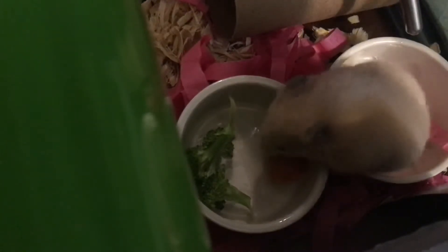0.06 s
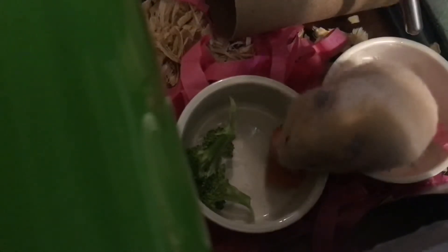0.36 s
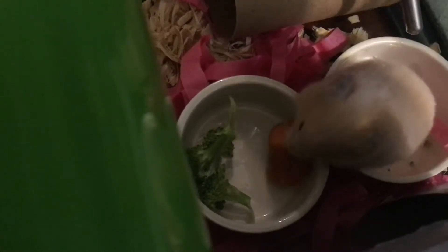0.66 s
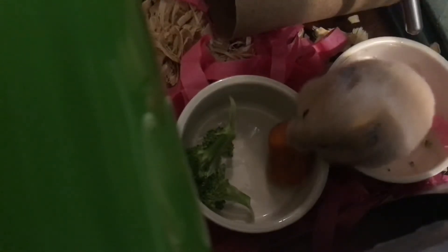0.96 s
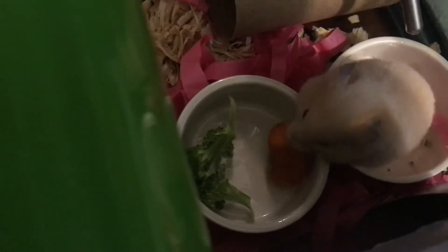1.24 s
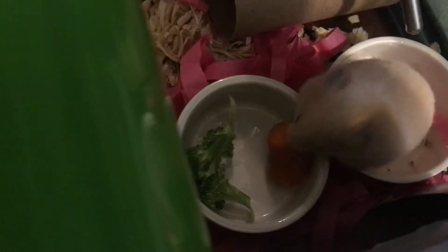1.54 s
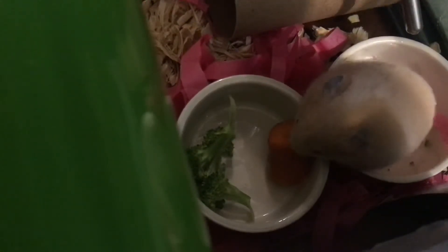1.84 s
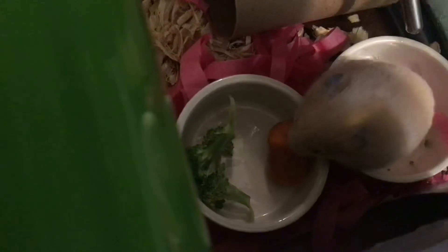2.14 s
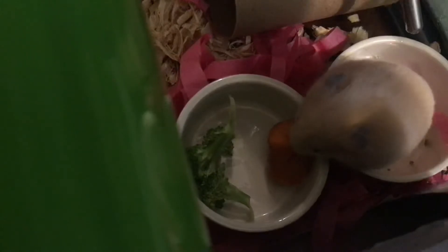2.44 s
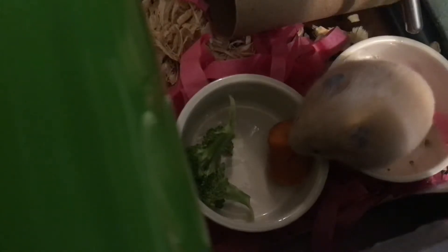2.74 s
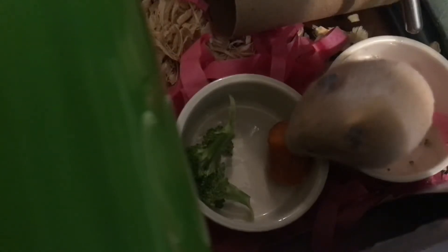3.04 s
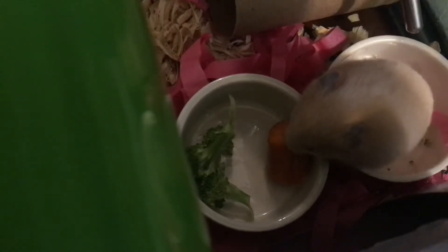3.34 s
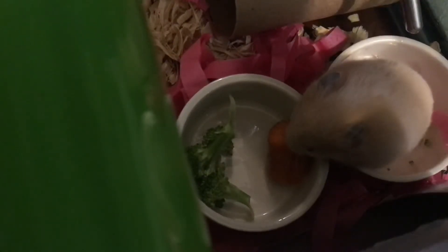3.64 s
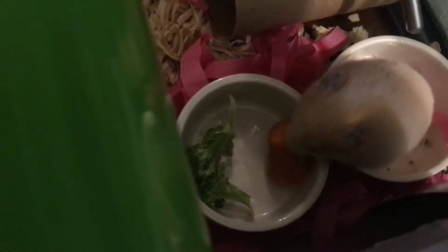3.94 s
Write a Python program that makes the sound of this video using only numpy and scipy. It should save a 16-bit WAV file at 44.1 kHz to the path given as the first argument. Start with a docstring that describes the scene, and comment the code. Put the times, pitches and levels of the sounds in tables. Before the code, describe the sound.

A hamster gnaws carrot close to the microphone in a quiet, humming room. Bedding rustles and claws knock on a ceramic bowl first, then come small irregular crunches with sharp snaps, faint tooth ticks and moist chewing.

```python
"""A cage in a quiet, humming, rumbling room: close up, a hamster gnaws carrot in a ceramic bowl.
Bedding rustles and claws knock and scratch on the bowl, then the bites start. Each bite is a
swelling crackle of bursting cells, with sharp snaps where a piece gives way. Faint tooth ticks
and moist pulp fill the gaps. The bowl rings briefly after each knock and snap."""
import sys
import numpy as np
from scipy import signal
from scipy.fft import rfft, irfft
from scipy.io import wavfile

SR = 44100
rng = np.random.default_rng(int(sys.argv[2]) if len(sys.argv) > 2 else 0)


def output_pcm(signal):
    """Save a mono or channel-first signal as 16-bit PCM at the path in sys.argv[1].

    Samples are clipped to [-1, 1] before scaling.
    """
    pcm = np.clip(np.atleast_2d(signal).T, -1, 1) * 32767
    wavfile.write(sys.argv[1], SR, np.round(pcm).astype(np.int16))


N = 176400
T = np.arange(N) / SR
ONSET_S = .00035

# carrot chewed in the mouth: f/Hz, gain/dB
CHEWED_SPECTRUM = [(300, -14), (800, -13), (1500, -9), (2000, -5), (3000, -2.5), (4200, -5.5), (5200, 3.5),
                   (6000, 2), (7100, 3), (8000, -7), (9400, -5), (10600, -8.5), (12000, -3), (12800, -4),
                   (13600, -9.5), (15000, -6), (16500, -10)]


def amp(db):
    """Decibels to gain."""
    return 10 ** (np.asarray(db) / 20)


def unit(x):
    """Scale to rms 1."""
    return x / np.sqrt(np.mean(x ** 2) + 1e-20)


def spectrum_db(points, hz):
    """Interpolate a spectrum over log frequency."""
    f, db = np.transpose(points)
    return np.interp(np.log(hz + 1), np.log(f), db)


def add(mix, at_s, sound):
    """Mix a sound in at a time."""
    part = mix[max(round(at_s * SR), 0):][:len(sound)]
    part += sound[:len(part)]


def colour(x, points, low_db=0, top_db=0, ring_hz=None, size=1024):
    """Minimum-phase filter: spectrum, two shelves, optional resonance. Keeps the energy."""
    hz = abs(np.fft.fftfreq(size, 1 / SR))
    db = spectrum_db(points, hz) + np.interp(hz, (670, 11400), [low_db, 0])
    db += np.interp(hz, (7700, 11000), [0, top_db])
    if ring_hz:
        db += 5 / (1 + ((hz - ring_hz) / 260) ** 2)
    response = np.exp(np.conj(signal.hilbert(np.log(amp(db)))))
    y = signal.fftconvolve(x, np.fft.ifft(response).real[:size // 2])
    return y * np.sqrt(np.sum(x ** 2) / (np.sum(y ** 2) + 1e-20))


def noise(density):
    """Noise with amplitude density(f) per root Hz."""
    white = rfft(rng.standard_normal(N))
    return irfft(white * density(np.fft.rfftfreq(N, 1 / SR)), N) * np.sqrt(SR / 2)


def burst(decay_s, hz=None, uneven=.6):
    """Brief fracture noise, or a damped ring if pitched. Energy of 1 ms at rms 1."""
    t = np.arange(700) / SR
    envelope = (1 - np.exp(-t / ONSET_S)) * np.exp(-t / decay_s)
    if hz is None:
        spectrum = rfft(envelope * rng.standard_normal(len(t)))
        spectrum /= abs(spectrum) ** (1 - uneven)  # 0 flat, 1 like noise
        y = irfft(spectrum) * np.exp(-t / (10 * decay_s))
    else:
        y = envelope * np.sin(2 * np.pi * hz * t)
    return y / np.linalg.norm(y) * np.sqrt(SR / 1000)


def crackle(per_s, pitches=32, spread_db=4, decay_s=.00028):
    """Random short pitched pops, mostly small, a few large."""
    onsets = np.flatnonzero(rng.random(N) < per_s / SR)
    gain = amp(spread_db * np.minimum(rng.exponential(1, N), 3.5)) * rng.choice([-1, 1], N)
    pitch_index = rng.integers(0, pitches, N)
    t, out = T[:SR // 500], np.zeros(N)
    pop_hz = np.linspace(700, 16000, pitches)[:, None]
    pops = np.sin(2 * np.pi * pop_hz * t) * np.exp(-t / decay_s)
    for n in onsets:
        add(out, n / SR, gain[n] * pops[pitch_index[n]])
    return unit(out)


def room():
    """Air noise with low resonances, wavering mains hum, soft low bumps."""
    air = [(20, -104), (35, -102.5), (75, -78.5), (100, -79.5), (170, -85.5), (215, -89), (265, -94.5),
           (340, -89.5), (450, -99), (560, -96.5), (680, -101.5), (1000, -105), (1400, -106.5),
           (2000, -108), (3000, -111.5), (6500, -114), (10300, -119), (13000, -115.5), (16000, -119)]  # noise floor: f/Hz, density/(dB per Hz)
    resonances = [(52.6, 16, -73.5), (140.1, 13.1, -68.5), (191, 65, -84), (380.4, 22, -84)]  # air resonances: f/Hz, width/Hz, density/(dB per Hz)
    hum = [(60, -60), (120, -53.5), (180, -58), (240, -64.5), (300, -69), (360, -70.5), (420, -85),
           (600, -80.5), (660, -78.5), (700.6, -80), (900, -83)]  # mains lines: f/Hz, rms level/dB
    bumps = [(.36, 0.03, -44.5, 54.47), (.45, 0.019, -52, 235), (1.62, 0.027, -50.5, 47),
             (1.73, 0.22, -58, 44), (2.67, 0.11, -55.5, 46), (3.37, 0.084, -53.5, 56),
             (3.665, 0.0084, -64, 440), (3.97, 0.031, -50.5, 48)]  # low bumps: t/s, width/s, level/dB, f/Hz
    out = noise(lambda f: amp(spectrum_db(air, f)))
    for hz, width_hz, db in resonances:
        out += noise(lambda f: amp(db) / (1 + ((f - hz) / width_hz) ** 2) ** 2)
    for hz, db in hum:
        waver = 1 + .2 * unit(noise(lambda f: np.exp(-f / 13)))
        out += amp(db) * np.sqrt(2) * waver * np.sin(2 * np.pi * (hz * T + rng.random()))
    for at_s, width_s, db, hz in bumps:
        swell = np.exp(-((T - at_s) / width_s) ** 2)
        out += amp(db) * np.sqrt(2) * swell * np.sin(2 * np.pi * (hz * T + rng.random()))
    return out


def cage(x):
    """Add reflections: bowl and walls, faint room tail, hollow of the cage."""
    hollow = [(250, -12), (550, 6.5), (1000, -3), (1500, 7.5), (2100, -3.5), (2900, 7.5), (6000, -32.5),
              (16000, -46)]  # cage resonance: f/Hz, gain/dB
    t, out = T[:SR // 3], x.copy()
    for t60_s, db, tint in (.024, -7, None), (.038, -10, None), (.035, -13, hollow):
        tail = rng.standard_normal(len(t)) * (t > .001) * 1000 ** (-t / t60_s)
        if tint:
            tail = colour(tail, tint)
        out += amp(db) * signal.fftconvolve(x, tail / np.linalg.norm(tail))[:N]
    return out


def bowl_ring(t60_s=.022):
    """Damped modes of the ceramic bowl, slightly detuned for each blow."""
    modes = [(1220, -23), (1530, -20), (1916, -13), (2090, -16), (2270, -20), (2446, -19), (3130, -26),
             (3600, -26), (4206, -27), (4890, -25), (12500, -29)]  # bowl modes: f/Hz, relative level/dB
    t = T[:SR // 8]
    detune = 1 + .02 * rng.uniform(-1, 1, len(modes))
    ring = sum(amp(db) * np.sin(2 * np.pi * (hz * ratio * t + rng.random()))
               for (hz, db), ratio in zip(modes, detune))
    return ring * 1000 ** (-t / t60_s)


def scrabbling(knock_gain_db=.5, grit_db=-13, grit_s=.005):
    """Bedding rustles and fades; knocks on the bowl drag into grit; claws scratch the glaze."""
    rustle_levels = [(0, -70.5), (.1, -71.5), (.25, -72), (.32, -86), (.6, -84), (.8, -103)]  # bedding envelope: t/s, level/dB
    rustle_spectrum = [(500, -18), (1800, 10.5), (3500, 2), (6500, 5), (8000, 0), (10500, -8), (12500, 12),
                       (13700, -3), (15500, 4)]  # bedding: f/Hz, gain/dB
    # claws and carrot on the bowl: t/s, relative level/dB, low shelf/dB, top shelf/dB
    knocks = [(0.1292, -52.5, 0, 5), (0.1362, -45, -6.5, 5), (0.153, -59, -8, 2), (.165, -46, -10, 0.5),
              (.195, -50, -19, 4), (.2224, -31, -1.5, 3), (.2247, -43, -1, 8), (.2285, -41.5, -5, 4),
              (0.234, -44, -8, 1), (0.2358, -37, 3.5, 10), (0.239, -45.5, 3, 2), (0.2582, -48.5, -2, 3),
              (0.3761, -58.5, 2, -13), (0.4522, -64, 7, -14)]
    knock_spectrum = [(250, 1), (700, 2.5), (1200, -14), (1950, -0.5), (2400, -2.5), (2900, -6.5),
                      (3900, -3), (5200, 4), (7600, -4.5), (8700, -2), (11200, -1.5), (12600, 6.5),
                      (13800, -4), (14800, 0.5), (16500, -11)]  # struck bowl: f/Hz, gain/dB
    scratches = [(.26, 0.014, -64, 13500), (.399, 0.011, -65.5, 15000), (1.598, 0.012, -66, 15000)]  # claws on glaze: t/s, width/s, level/dB, f/Hz
    bedding = colour(unit(rng.standard_normal(N) + crackle(per_s=880)), rustle_spectrum)[:N]
    out = amp(np.interp(T, *np.transpose(rustle_levels))) * bedding
    t = T[:SR // 30]
    for at_s, db, low_db, top_db in knocks:
        blow = amp(grit_db) * np.exp(-t / grit_s) * rng.standard_normal(len(t))
        add(blow, 0, burst(decay_s=.0008))
        add(out, at_s, amp(db + knock_gain_db) * colour(blow, knock_spectrum, low_db, top_db))
        add(out, at_s, amp(db + low_db + knock_gain_db) * bowl_ring())
    for at_s, width_s, db, hz in scratches:
        hiss = unit(noise(lambda f: 1 / (1 + ((f - hz) / 1800) ** 2)))
        out += amp(db) * np.exp(-((T - at_s) / width_s) ** 2) * hiss
    return out


def carrot_spectrum(at_s, chew_start_s=1.5):
    """Carrot is gnawed first, then chewed."""
    gnawed = [(300, -23), (800, -11), (1500, -6), (2000, -2), (3000, -4.5), (4200, -2.5), (5200, 4),
              (6000, 1), (7100, -1), (8300, -3.5), (9400, 0.5), (10600, -9), (12200, 1), (13600, -12),
              (15000, -7), (16500, -4.5)]  # carrot at the front teeth: f/Hz, gain/dB
    return gnawed if at_s < chew_start_s else CHEWED_SPECTRUM


def chewing():
    """Fine crackle of moist pulp."""
    levels = [(1.5, -92), (1.58, -75), (1.75, -79), (2.1, -82), (2.4, -75), (2.65, -73), (3.0, -75),
              (3.25, -79), (3.5, -71), (3.7, -74), (3.82, -78), (4, -76)]  # pulp envelope: t/s, level/dB
    pulp = colour(crackle(per_s=450), CHEWED_SPECTRUM, low_db=-10, top_db=-8, ring_hz=6900)[:N]
    return amp(np.interp(T, *np.transpose(levels))) * pulp


def ticking(gain_db=4, low_db=-10.5):
    """Single tooth ticks with a short ring."""
    ticks = [(.571, -60.5, -6), (0.709, -67, -5), (.963, -67, -1), (1.1173, -61.5, -19), (1.2525, -62, 12),
             (1.597, -62, -10), (1.638, -58, 3), (1.641, -58, -4), (1.653, -59, -5), (2.2237, -67, 4),
             (2.2875, -59, 0), (2.385, -73, -2), (2.4822, -62.5, 1), (2.5685, -56, -3), (2.597, -60, 6),
             (2.6165, -67, -9), (2.6193, -55, -10), (2.6295, -66, -10), (2.653, -64, -17),
             (2.708, -62, -12), (2.816, -58, -7), (2.9085, -58, 20), (2.9623, -61, 2), (2.987, -60.5, -10),
             (3.011, -63, -1), (3.146, -58, 7), (3.2487, -56.5, -4), (3.33, -65.5, -1), (3.4073, -54, -8),
             (3.492, -63, 0), (3.5, -58, -8), (3.506, -67, -5), (3.5122, -58.5, -7), (3.552, -62, 6),
             (3.6208, -67, 5), (3.6493, -63.5, 3), (3.984, -57.5, -8), (3.9925, -59, -8)]  # tooth ticks: t/s, relative level/dB, top shelf/dB
    out = np.zeros(N)
    for at_s, db, top_db in ticks:
        ring_hz = rng.uniform(4960, 7300)
        tick = colour(burst(decay_s=.0008), carrot_spectrum(at_s), low_db, top_db, ring_hz)
        add(out, at_s, amp(db + gain_db) * tick)
    return out


def fibre_ring(hz, spread=.075, decay_s=.0008):
    """A snapping fibre rings at five close pitches. Energy of 1 ms at rms 1."""
    t = T[:SR // 100]
    pitches_hz = hz * (1 + spread * np.linspace(-1, 1, 5))
    ring = sum(np.sin(2 * np.pi * (f * t + rng.random())) for f in pitches_hz)
    ring *= (1 - np.exp(-t / ONSET_S)) * np.exp(-t / decay_s)
    return ring / np.linalg.norm(ring) * np.sqrt(SR / 1000)


def snapping(gain_db=-1.5, bowl_db=-7.5):
    """A piece gives way: crack, fibre ring, bowl ring, dull recoil."""
    # fractures: t/s, relative level/dB, low shelf/dB, top shelf/dB, ring f/Hz, ring re crack/dB
    snaps = [(0.701, -59, 3, 2, 5060, 4.5), (0.8754, -40, 18.5, 16, 9430, 4.5),
             (.969, -55, 17, 10, 4900, -4), (1.0107, -51.5, 14, 14, 9100, 1.5),
             (1.145, -39.5, -12, -18, 8550, -14), (1.369, -51.5, 9, 8, 5220, 6),
             (1.626, -45, -4, 12, 6620, 6.5), (2.174, -49, -9, -1.5, 8940, -10),
             (2.2688, -46, 4, 23, 12300, -2), (2.4276, -48.5, -1, 3, 5300, 4.5),
             (3.0444, -51.5, -21, -7, 6970, 12), (3.417, -54, -16, 0, 6950, 1),
             (3.4363, -45.5, -11, -9, 7000, -20), (3.877, -47, -9, -12, 7000, -9)]
    recoil = [(827, -29.5, 0.003), (1400, -26.5, 0.0016)]  # knock of the piece: f/Hz, relative level/dB, decay/s
    out = np.zeros(N)
    for at_s, db, low_db, top_db, ring_hz, ring_db in snaps:
        crack = colour(burst(decay_s=.0007), carrot_spectrum(at_s), low_db, top_db)
        add(out, at_s, amp(db + gain_db) * crack)
        add(out, at_s, amp(db + gain_db + ring_db) * fibre_ring(ring_hz))
        add(out, at_s, amp(db + low_db / 2 + bowl_db) * bowl_ring())
        for knock_hz, knock_db, decay_s in recoil:
            add(out, at_s, amp(db + low_db + knock_db) * burst(decay_s, knock_hz))
    return out


def biting(gain_db=1.5, edge_db=-26, tear_gain=.55):
    """Cells burst faster than the ear can count, swelling with tooth pressure."""
    # bites: peak t/s, build-up/s, release/s, relative level/dB, low shelf/dB, top shelf/dB, ring f/Hz
    bites = [(0.276, 0.21, 0.057, -66, 23.5, 13, 6000), (0.549, .05, .04, -72.5, 9, 3, 5500),
             (0.705, 0.023, 0.03, -68.5, 6, 2, 5000), (0.861, 0.086, 0.059, -66.5, -26, -11, 8000),
             (0.973, 0.016, 0.032, -59, 15, 8, 5170), (1.005, .04, 0.023, -65.5, -18, -13, 9600),
             (1.029, 0.012, 0.019, -62, -5, -4, 9600), (1.14, 0.039, 0.014, -58, 4, 4, 9600),
             (1.241, .02, 0.014, -62, 18, 13, 5300), (1.258, 0.018, 0.026, -58, 23, 7, 3870),
             (1.273, .008, 0.0075, -67, 16, 7, 2000), (1.371, 0.014, 0.021, -59.5, 14.5, 5, 5440),
             (1.597, 0.05, 0.025, -66.5, -18, -21, 6700), (1.636, 0.045, 0.024, -54, -20, -13, 7300),
             (1.656, .014, 0.015, -58.5, -3, 0, 7000), (1.755, .02, .02, -73, -6, -10, 6960),
             (1.854, 0.016, 0.0098, -65, -5, -8, 6940), (1.93, 0.019, 0.023, -61.5, 2, 4.5, 7100),
             (1.978, .014, 0.0099, -69, 23, -2, 7000), (2.06, 0.012, 0.014, -63.5, 15, 8, 6900),
             (2.176, 0.027, .03, -63.5, -1, 3, 7140), (2.257, 0.0061, .014, -60, -16, 4, 7000),
             (2.279, 0.022, 0.055, -59, -4, 0, 5300), (2.418, 0.017, 0.017, -70.5, 14, 10, 7000),
             (2.438, .027, 0.031, -55, 2, -1, 6000), (2.567, 0.024, 0.039, -58, 8.5, 5, 7200),
             (2.68, 0.028, 0.017, -63, 6, 4, 7250), (2.727, 0.029, 0.024, -67.5, 9, 11, 11500),
             (2.789, 0.015, .024, -66.5, -11, -5, 7000), (2.818, 0.03, 0.041, -59, 2, 5, 7200),
             (2.953, 0.035, 0.041, -58.5, -4, -2, 7200), (3.062, 0.022, 0.061, -65.5, -16, -18, 7000),
             (3.095, 0.03, 0.017, -55, -3, -2, 5900), (3.19, 0.012, 0.019, -70.5, -4, 0, 7050),
             (3.42, 0.033, 0.028, -52, -8.5, -3, 7140), (3.554, 0.063, 0.039, -62.5, -1, 1, 7300),
             (3.76, 0.027, 0.027, -75.5, -17, -4, 7040), (3.878, .035, 0.044, -64.5, 6, 7, 5440),
             (3.993, 0.042, .035, -65, 3, 0, 7100)]
    out = np.zeros(N)
    cells = unit(crackle(per_s=3500) + tear_gain * rng.standard_normal(N))
    for peak_s, build_s, release_s, db, low_db, top_db, ring_hz in bites:
        span = (T > peak_s - 1.5 * build_s) & (T < peak_s + 1.5 * release_s)
        t = T[span] - peak_s
        pressure = amp(edge_db * np.maximum(-t / build_s, t / release_s))
        crunch = colour(pressure * unit(cells[span]), carrot_spectrum(peak_s), low_db, top_db, ring_hz)
        add(out, T[span][0], amp(db + gain_db) * crunch)
    return out


def scene():
    """Humming room plus the hamster in its cage, mono."""
    return (room() + cage(scrabbling() + biting() + snapping() + ticking() + chewing()))[None]


def record(dry):
    """Low-pass at 16050 Hz."""
    taps = signal.firwin(255, 16050, window=("kaiser", 8), fs=SR)
    return signal.oaconvolve(dry, taps[None], "same")


dry = scene()
out = record(dry)
output_pcm(out)
```